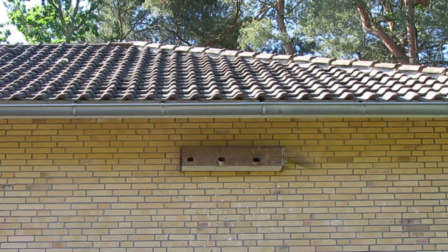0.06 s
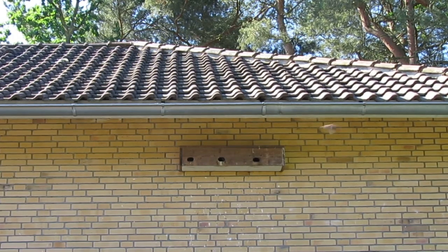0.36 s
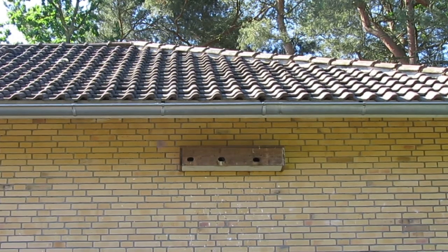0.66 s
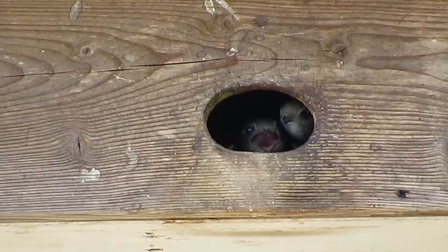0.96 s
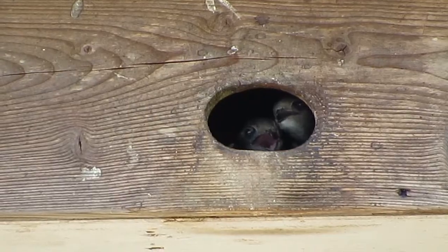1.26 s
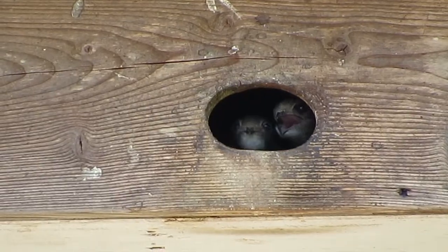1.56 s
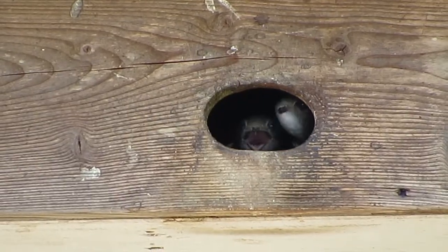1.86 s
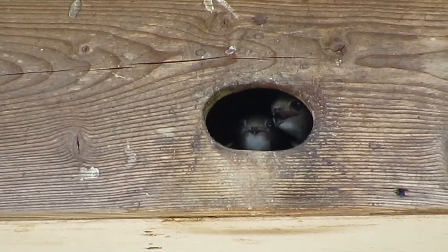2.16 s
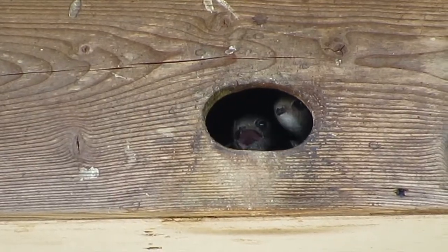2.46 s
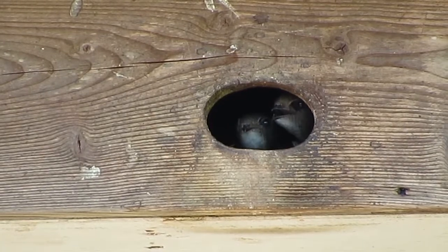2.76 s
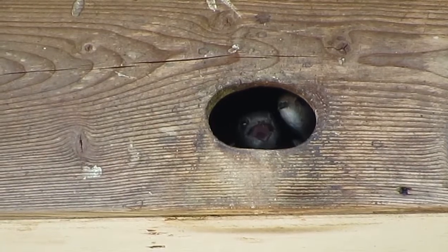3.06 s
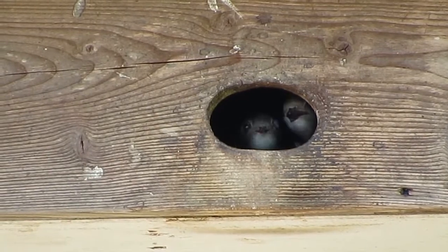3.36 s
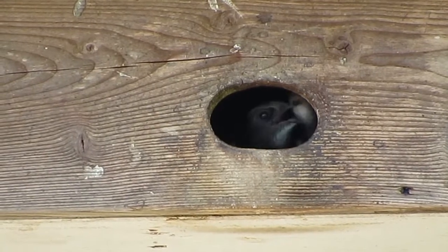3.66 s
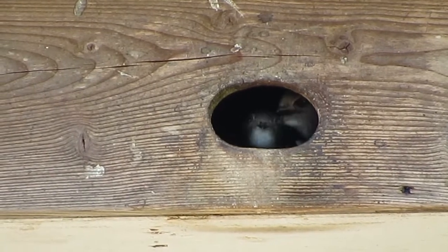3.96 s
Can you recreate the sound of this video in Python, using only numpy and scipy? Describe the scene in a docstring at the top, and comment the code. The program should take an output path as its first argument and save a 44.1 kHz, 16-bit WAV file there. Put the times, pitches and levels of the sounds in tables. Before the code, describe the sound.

High, raspy swift screeches repeat at a nest box outdoors, softer at first, then louder, linked by quick pips and echoing slightly off the wall. Small birds chirp faintly, and a soft background hiss abruptly turns closer early on.

```python
"""Under the eaves of a brick house, swifts scream in turns at a nest box. Each scream scoops up as a
whistle, breaks into a fast buzz and often ends in a slower trill; short pips lead into the next.
The wall echoes them and the yard adds a tail. Small birds call from the trees over a soft hiss,
which gives way abruptly to a closer one with a faint hum and puffs of wind on the microphone."""
import sys
import numpy as np
from scipy import signal
from scipy.fft import rfft, irfft, next_fast_len
from scipy.io import wavfile
from scipy.ndimage import uniform_filter1d, map_coordinates

SR = 44100
rng = np.random.default_rng(int(sys.argv[2]) if len(sys.argv) > 2 else 0)


def log_audio(samples):
    """Write samples as a 16-bit WAV file to the path given in sys.argv[1]."""
    # one column per channel
    frames = np.atleast_2d(samples).T
    # limit to full scale, then quantise
    limited = np.clip(frames, -1, 1)
    pcm = np.round(limited * 32767).astype(np.int16)
    wavfile.write(sys.argv[1], SR, pcm)


N = 176400


def amp(db):
    """Decibels to gain."""
    return 10 ** (np.asarray(db) / 20)


def unit(x):
    """Scale to rms 1."""
    return x / np.sqrt(np.mean(x ** 2) + 1e-20)


def along(points, hz):
    """Interpolate (frequency [Hz], value) points on a log axis."""
    f, v = np.transpose(points)
    return np.interp(np.log(hz + 1), np.log(f + 1), v)


def wobble(rate_hz, n):
    """Smooth random curve, rate_hz knots a second."""
    position = np.arange(n) * min(rate_hz / SR, 1)
    return map_coordinates(rng.standard_normal(n + 4), [position], order=3, mode="mirror")


def filtered(x, response):
    """Apply a frequency response."""
    m = next_fast_len(N + SR // 2)
    return irfft(rfft(x, m) * response(np.fft.rfftfreq(m, 1 / SR)), m)[..., :N]


def add(track, start_s, sound):
    """Mix a sound into a track."""
    i = max(round(start_s * SR), 0)
    track[i:i + len(sound)] += sound[:max(N - i, 0)]


def cycle(hz):
    """Running phase of a frequency curve."""
    return 2 * np.pi * np.cumsum(hz) / SR


def rough_sine(hz, jitter_hz):
    """Sine with fast pitch jitter."""
    return np.sin(cycle(hz + jitter_hz * wobble(1300, len(hz))))


# Scream shapes: (first pitch [Hz], top pitch [Hz], last pitch [Hz], rise [s], whistle length [s],
SCREAMS = [ (4920, 5200, 5150, 0.0291, .002, 0.2, -50, None, None),
           (5010, 5300, 4600, 0.035, 0.0014, 0.42, -50, .515, 69),
           (4670, 6230, 6070, 0.019, 0.148, 0.17, -17, None, None),
           (5170, 6560, 6350, .022, .15, 0.46, -48, None, None),
           (4470, 6500, 6050, .032, 0.14, 0.24, -15.5, 2.023, 79),
           (5000, 6070, 6100, 0.0074, 0.024, 0.23, -44, None, None),
           (4900, 6350, 5850, 0.03, 0.12, 0.35, -17.5, 2.563, 110),
           (4500, 5520, 5520, 0.011, 0.031, .22, -44, None, None),
           (4727, 6150, 5480, 0.03, .14, 0.3, -20.5, 3.118, 75),
           (4600, 5450, 5460, .013, 0.028, 0.18, -45, None, None),
           (5024, 6130, 5650, 0.024, 0.077, 0.16, -19.5, 3.658, 77),
           (4860, 5060, 5150, 0.0212, .002, 0.43, -50, None, None)]
# Vocal effort, one curve per scream: (time [s], level [dB], octave level before trim [dB])
EFFORT_CURVES = [
    [(0.0, -33.5, -50.5), (0.072, -36, -51), (0.08, -31, -53.5), (0.085, -41.5, -65)],
    [(0.332, -37.5, -48), (0.35, -35, -51.5), (0.496, -36.5, -53), (0.512, -33, -47.5),
     (0.588, -32.5, -59.5), (0.596, -43, -52.5), (0.624, -32.5, -65), (0.67, -53, -71)],
    [(0.9, -32, -57), (0.906, -29.5, -44.5), (0.942, -24.5, -28), (0.976, -27.5, -30.5), (1.056, -25, -34),
     (1.212, -34, -43), (1.258, -30, -40), (1.265, -47, -49)],
    [(1.302, -34.5, -45.5), (1.322, -22, -32), (1.358, -23, -43), (1.41, -18.5, -36.5), (1.434, -19.5, -40),
     (1.5, -26.5, -39.5), (1.642, -27, -47.5), (1.712, -30, -48)],
    [(1.714, -38, -44.5), (1.73, -29.5, -41), (1.788, -23.5, -27.5), (1.904, -35, -33), (1.91, -26.5, -38),
     (2.016, -34.5, -45), (2.024, -27.5, -31), (2.085, -29.5, -34.5)],
    [(2.08, -26, -37), (2.122, -25, -39), (2.264, -25.5, -40.5), (2.292, -26.5, -45), (2.298, -34, -54)],
    [(2.368, -27, -51), (2.382, -33, -43), (2.418, -21, -33), (2.448, -26.5, -30.5), (2.522, -31, -31.5),
     (2.542, -31, -45), (2.578, -26.5, -29.5), (2.638, -27.5, -40)],
    [(2.638, -39, -51), (2.658, -22, -35), (2.684, -25.5, -43.5), (2.81, -27.5, -42), (2.824, -30.5, -54.5),
     (2.832, -54, -61)],
    [(2.924, -24.5, -48), (2.992, -30, -34.5), (3.102, -28, -39.5), (3.116, -38, -50), (3.124, -26, -35),
     (3.186, -30.5, -39.5), (3.232, -36.5, -52), (3.235, -50, -53)],
    [(3.238, -35, -53), (3.25, -32, -41), (3.308, -26, -45.5), (3.362, -33, -44.5), (3.398, -29, -45),
     (3.404, -33, -46.5), (3.43, -32, -53), (3.44, -34, -64.5)],
    [(3.485, -25, -38.5), (3.499, -30, -61.5), (3.507, -27.5, -34), (3.545, -24, -42.5), (3.551, -32, -37),
     (3.641, -29.5, -40.5), (3.711, -29, -36.5), (3.76, -35, -49)],
    [(3.76, -37.5, -48), (3.804, -38.5, -66), (3.832, -37, -62), (3.842, -36.5, -66), (3.874, -36, -51),
     (3.888, -41, -58), (3.902, -36, -70), (3.91, -36, -71)],
]


def scream(row, effort, air):
    """A whistle scoops up, breaks into raspy buzzing pulses, then sags and may slow to a trill."""
    first_hz, top_hz, last_hz, rise_s, whistle_s, rough, undertone_db, trill_s, trill_hz = row
    times_s, level_db, octave_db = np.transpose(effort)
    buzz_start_hz, buzz_end_hz, break_s = 256, 202, 0.032
    sharpness, swing_hz, waver_hz, rough_hz = 0.77, 127, 21.1, 524
    sag_from, second_ratio, second_lag_s = 0.3, 0.9, 0.018
    catch_db, catch_s, octave_trim_db = -14, 0.0028, -1
    t = np.arange(int((times_s[-1] - times_s[0]) * SR)) / SR
    n, now_s = len(t), times_s[0] + t
    broken = (1 + np.tanh((t - whistle_s) / break_s)) / 2
    blend = lambda whistle, buzz: whistle + (buzz - whistle) * broken

    beat = cycle(np.linspace(buzz_start_hz, buzz_end_hz, n) * (1 + 0.018 * wobble(121, n)))
    catch = 1
    if trill_s:
        in_trill = now_s > trill_s
        beat = np.where(in_trill, 2 * np.pi * trill_hz * (now_s - trill_s), beat)
        sharpness = np.where(in_trill, 1.6, sharpness)
        swing_hz = np.where(in_trill, 124, swing_hz)
        rough = np.where(in_trill, 0.11, rough)
        # the voice catches just before the trill
        catch = amp(catch_db * np.exp(-((now_s - trill_s) / catch_s + 1) ** 2))
    depth = blend(0.53, 0.99)
    leaning_beat = beat + 0.43 * (1 - np.cos(beat))  # pulses open faster than they close
    pulses = np.abs(np.sin(leaning_beat / 2)) ** (2 * sharpness)
    scatter_db = wobble(201.8, n)
    gate = np.abs(uniform_filter1d(1 - depth + depth * pulses, size=16)) * amp(scatter_db)
    even_rms = lambda g: g / np.sqrt(np.abs(uniform_filter1d(g * g, size=1200)) + 1e-9)

    sag = np.clip((t / t[-1] - sag_from) / (1 - sag_from), 0, 1) ** 1.8
    arch_hz = top_hz + (first_hz - top_hz) * np.exp(-t / rise_s) + (last_hz - top_hz) * sag
    hz = arch_hz + waver_hz * wobble(90, n) - depth * swing_hz * np.sin(beat)
    shake_hz = depth * rough * rough_hz * blend(0.14, 1) * wobble(1300, n)

    undertones = rough_sine(1.5 * hz, jitter_hz=317) + amp(-11.5) * rough_sine(hz / 2, jitter_hz=158.5)
    # lower voice from the other side of the syrinx
    second_hz = second_ratio * np.interp(t - second_lag_s, t, arch_hz)
    second = amp(-18) * np.clip(t / second_lag_s, 0, 1) * rough_sine(second_hz, jitter_hz=128)
    tone = np.sin(cycle(hz + shake_hz)) + blend(0.79, 0) * amp(undertone_db) * undertones
    tone += blend(0.84, 0.36) * second + blend(0.18, 0.95) * air[:n]
    voice = amp(np.interp(now_s, times_s, level_db)) * even_rms(gate) * tone
    octave = rough_sine(2 * (hz + 0.509 * shake_hz), jitter_hz=69.4)
    octave *= amp(np.interp(now_s, times_s, octave_db) + octave_trim_db) * even_rms(gate ** 1.22)
    return np.sqrt(2) * (voice + octave) * catch * signal.windows.tukey(n, 0.02)


# Pips, levels before trim: (time [s], length [s], pitch [Hz], glide [Hz], level [dB], octave level [dB])
PIPS = [(0.091, 0.014, 5070, 198.5, -30.5, -43), (0.117, 0.0148, 5304, 95.5, -28.5, -45),
        (0.14, 0.02, 5310, 98, -33, -46.5), (.163, 0.017, 5385, 0, -30.5, -46),
        (.19, 0.015, 5265, 0, -25.5, -46), (0.218, 0.00774, 5007, -200, -25.5, -44),
        (.775, 0.007, 5900, 0, -29.5, -48), (.796, 0.0064, 4620, -1200, -24, -37.5),
        (0.822, 0.00755, 5576, 0, -22, -33.5), (0.848, 0.0051, 5530, 4, -15, -27.5),
        (0.876, .006, 5660, -3, -20.5, -35), (1.285, 0.011, 6140, 0, -26.5, -31),
        (1.299, 0.0065, 6100, 0, -20, -26), (1.33, 0.00866, 5920, 0, -27, -36),
        (1.347, .007, 5700, 0, -21, -31), (1.365, 0.01, 5680, -5, -28, -37),
        (1.73, 0.0091, 6030, 200, -22, -30), (1.755, 0.012, 6260, -1, -18.5, -29),
        (1.911, 0.0048, 6400, 0, -20, -36), (2.31, 0.014, 6020, 503.5, -23.5, -34),
        (2.335, 0.018, 6280, 52.5, -17.5, -37), (2.364, 0.015, 5930, 200, -21, -37),
        (2.841, 0.011, 5830, 700, -22, -33), (2.869, 0.012, 6120, 250, -19, -30.5),
        (2.898, 0.0092, 6105, 247, -20, -32.5), (3.449, .013, 5740, 700, -24, -36),
        (3.476, .014, 6040, 350, -21, -32), (3.919, 0.016, 5405, 400, -26.5, -43),
        (3.946, 0.013, 5741, 400, -23, -39), (3.975, 0.0174, 5560, 448.5, -24, -44)]


def pip(note, air, jitter_hz=110, attack_s=0.00068, release_s=0.0068, trim_db=-0.7):
    """One short, breathy, gliding note of the same voice."""
    length_s, pitch_hz, glide_hz, level_db, octave_db = note
    t = np.arange(int(length_s * SR)) / SR
    n = len(t)
    phase = cycle(pitch_hz + glide_hz * np.linspace(-0.5, 0.5, n) + jitter_hz * wobble(1170, n))
    voice = amp(level_db) * (np.sin(phase) + amp(-24) * np.sin(1.5 * phase) + 0.76 * air[:n])
    octave = amp(octave_db) * np.sin(2 * phase)
    envelope = np.clip(np.minimum(t / attack_s, (length_s - t) / release_s), 0, 1)
    return np.sqrt(2) * amp(trim_db) * (voice + octave) * envelope


# Air noise in the beak: (frequency [Hz], relative level [dB])
BEAK_AIR = [(1500, -30.5), (3000, -10.5), (4000, -11), (5000, -3), (6500, 2.5), (8000, -3.5), (10000, -8),
            (12000, -3), (14000, -33.5)]


def swifts(air_db=-18):
    """Screams and pips, each with air rushing through the beak."""
    voice = np.zeros(N)
    rasp = filtered(rng.standard_normal(N), lambda hz: amp(along(BEAK_AIR, hz)))
    air = amp(air_db) * unit(rasp) / np.sqrt(2)
    air_at = lambda start_s: np.roll(air, -int(start_s * SR))
    for row, effort in zip(SCREAMS, EFFORT_CURVES):
        start_s = effort[0][0]
        add(voice, start_s, scream(row, effort, air_at(start_s)))
    for start_s, *note in PIPS:
        add(voice, start_s, pip(note, air_at(start_s)))
    return voice


# Songbird notes, plus one faint scoop of a farther swift at 0.273 s: (time [s], length [s], first pitch [Hz],
# last pitch [Hz], level before trim [dB])
SONG_NOTES = [(0, 0.113, 2160, 2070, -54), (0.195, 0.11, 2620, 3080, -54), (0.242, .025, 4450, 4280, -40.5),
              (0.273, 0.09, 6100, 6870, -51.5), (.31, 0.14, 2830, 2740, -51.5),
              (0.763, 0.094, 2480, 2245, -58), (1.812, 0.0089, 5150, 4860, -32.5),
              (1.814, 0.011, 4340, 4214, -36), (2.395, 0.012, 4840, 4850, -25),
              (2.418, 0.0146, 4280, 3515, -38.5), (3.533, 0.017, 4630, 4600, -27.5),
              (3.556, 0.0124, 4350, 3463, -39.5)]


def songbirds(waver_hz=24.9, trim_db=2.56):
    """Wavering, gliding chirps and whistles from the trees, and one faint scoop of a farther swift."""
    song = np.zeros(N)
    for start_s, length_s, first_hz, last_hz, level_db in SONG_NOTES:
        n = int(length_s * SR)
        hz = np.linspace(first_hz, last_hz, n) + waver_hz * wobble(488, n)
        note = np.sqrt(2) * np.sin(cycle(hz)) * signal.windows.tukey(n, 0.6)
        add(song, start_s, amp(level_db + trim_db) * note)
    return song


# First reflections: (delay [s], left gain [dB], right gain [dB])
ECHOES = [(.0031, -46, -6), (.0074, -13, -15), (0.0129, -6.5, -38.5), (0.0229, -15, -11)]


def walls(x, left_lead_s=8e-6):
    """Direct sound, reaching the left port first, plus echoes from eaves, wall and ground."""
    stereo = filtered(x, lambda hz: np.exp(np.pi * 1j * hz * left_lead_s * np.array([[1], [-1]])))
    for delay_s, *gains_db in ECHOES:
        for channel, gain_db in zip(stereo, gains_db):
            add(channel, delay_s, amp(gain_db) * x)
    return stereo


# Yard decay: (frequency [Hz], T60 [s])
YARD_T60 = [(500, 0.49), (4500, 0.32), (7000, 0.8), (13000, 0.073)]


def yard(x):
    """Diffuse tail; rings longest near 7 kHz and dies fastest in the top treble."""
    hz, t, noise = signal.stft(rng.standard_normal((2, SR // 2)), SR, nperseg=256)
    decay = amp(-60 * t / along(YARD_T60, hz)[:, None])
    tail = signal.istft(noise * decay, SR, nperseg=256)[1]
    return signal.fftconvolve(x[None], tail / np.linalg.norm(tail[0]), axes=1)[:, :N]


# Stereo image of the background: (frequency [Hz], left-right correlation [-1 to 1])
CORRELATION = [(60, -0.74), (160, -0.78), (260, -0.472), (450, -0.37), (710, -0.65), (1200, -0.21),
               (2000, -0.024), (3200, 0.21), (8000, -0.1)]


def rush(spectrum):
    """Stereo noise of rms 1; the mid/side balance sets the correlation."""
    def response(hz):
        angle = np.arccos(np.clip(along(CORRELATION, hz), -1, 1)) / 2
        return amp(along(spectrum, hz)) * [np.cos(angle), np.sin(angle)]

    mid, side = filtered(rng.standard_normal((2, N)), response)
    return unit(np.array([mid + side, mid - side]))


# Outdoor noise spectra: (frequency [Hz], relative density [dB])
FAR_WHIRR = [(15, -69), (25, -41), (87, -18), (279, -26), (351, -16), (406, -22.5), (479, -0.5),
             (654, -16.5), (971, -14), (1740, -29.5), (2050, -29.5), (2800, -30.5), (3600, -31.5),
             (4680, -51), (7920, -120)]
NEAR_WHIRR = [(190, -27.5), (330, -13), (354, -14.5), (459, -15.5), (523, -6), (589, -12.5), (749, 0.5),
              (1000, -19), (1140, -13), (1460, -18.5), (3600, -30), (4680, -65.5), (7920, -120)]
RUMBLE = [(20, -1.5), (45, 5.5), (90, -7.5), (200, -2.5), (330, -7.5), (500, -38)]
HISS = [(800, 6), (2200, -5), (3400, 0), (5000, 3), (9000, -4.5), (13000, -4)]


def far_air():
    """Distant, steady whirr, rumble and hiss."""
    return amp(-42) * rush(FAR_WHIRR) + amp(-66.5) * rush(RUMBLE) + amp(-51) * rush(HISS)


def near_air(flutter_db=0.77, right_bias_db=1.5):
    """Closer, gently wavering whirr with hiss and more rumble."""
    whirr = amp(-42 + flutter_db * wobble(8.79, N)) * rush(NEAR_WHIRR)
    pan = amp(right_bias_db * np.array([[-0.5], [0.5]]))
    return pan * (whirr + amp(-50.5) * rush(HISS) + amp(-54.5) * rush(RUMBLE))


def hum(t, pitch_hz=276.5, level_db=-47, right_phase_rad=1.54):
    """Faint steady tone, shifted in phase between the channels."""
    phase = 2 * np.pi * pitch_hz * t + np.array([[0], [right_phase_rad]])
    return amp(level_db) * np.sqrt(2) * np.sin(phase)


# Wind puffs: (time [s], half width [s], level [dB])
PUFFS = [(.86, 0.0415, -51), (1.09, 0.058, -47), (1.506, .022, -32.5), (2.28, 0.026, -59),
         (3.62, 0.081, -52)]
# Wind spectrum: (frequency [Hz], relative density [dB])
WIND_SPECTRUM = [(20, -21.5), (45, 6.5), (120, 0), (220, -9), (400, -37), (1000, -70)]


def wind(t):
    """Puffs of wind buffet the microphone with low noise."""
    envelope = sum(amp(db) * np.exp(-0.5 * ((t - at_s) / width_s) ** 2) for at_s, width_s, db in PUFFS)
    return envelope * rush(WIND_SPECTRUM)


def background(switch_s=0.772, fade_s=0.004):
    """Distant noise gives way abruptly to closer noise with hum and wind."""
    t = np.arange(N) / SR
    close = np.clip((t - switch_s) / fade_s, 0, 1)
    return (1 - close) * far_air() + close * (near_air() + hum(t) + wind(t))


def scene(swift_send_db=-8.5, song_send_db=-4.5):
    """Swifts at the wall, songbirds farther off, the yard's tail and the background."""
    calls, song = swifts(), songbirds()
    tail = yard(amp(swift_send_db) * calls + amp(song_send_db) * song)
    return walls(calls) + song + tail + background()


# Microphone response: (frequency [Hz], gain [dB])
MIC_RESPONSE = [(3700, 2), (3930, -6.5), (4150, -0.5), (12600, -0.5), (13200, -3), (14000, -2.5),
                (15000, -37)]


def record(dry, cutoff_hz=14800):
    """The microphone's colour and band limit."""
    return filtered(dry, lambda hz: amp(along(MIC_RESPONSE, hz)) * (hz < cutoff_hz))


dry = scene()
out = record(dry)
log_audio(out)
```